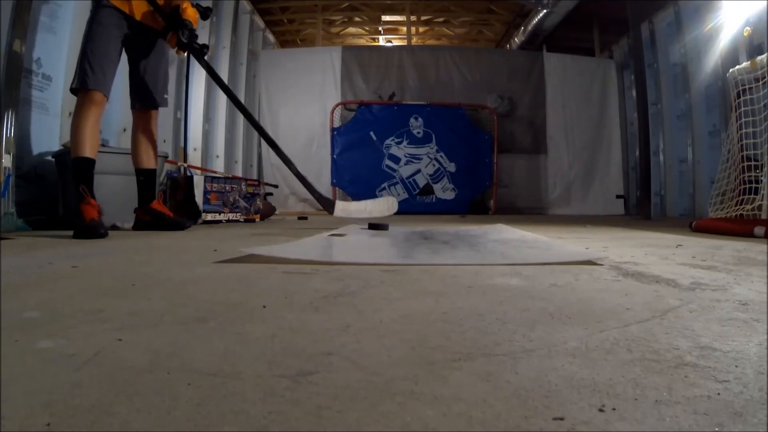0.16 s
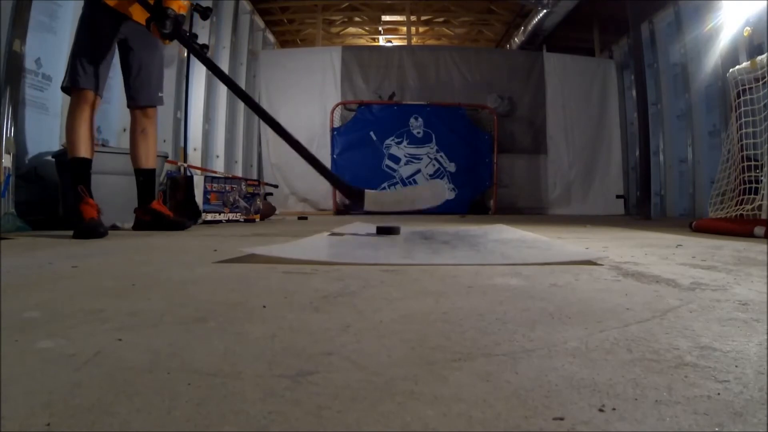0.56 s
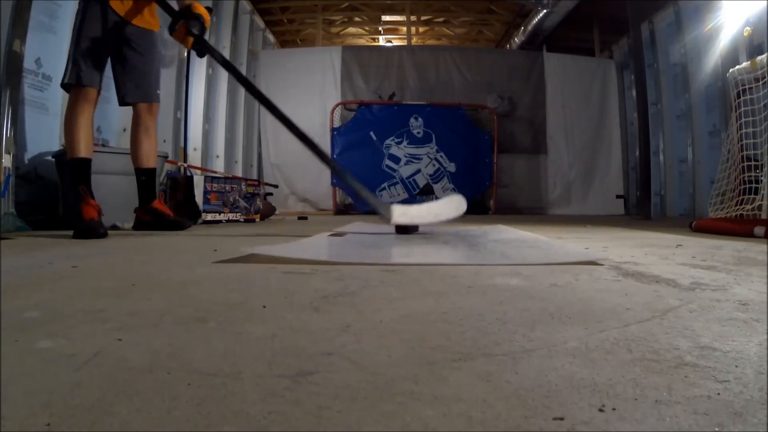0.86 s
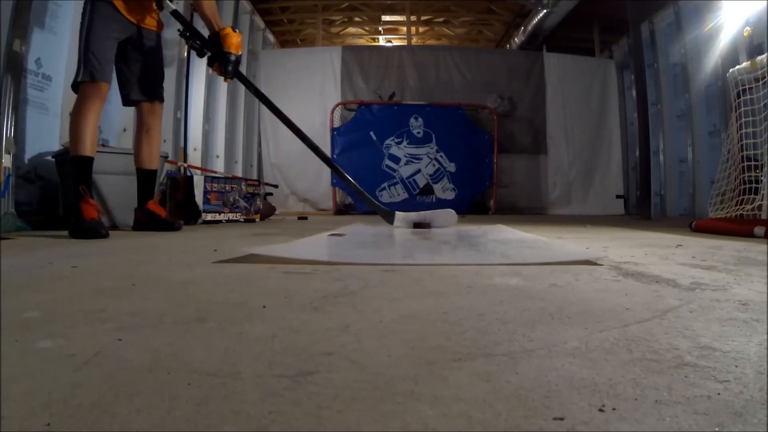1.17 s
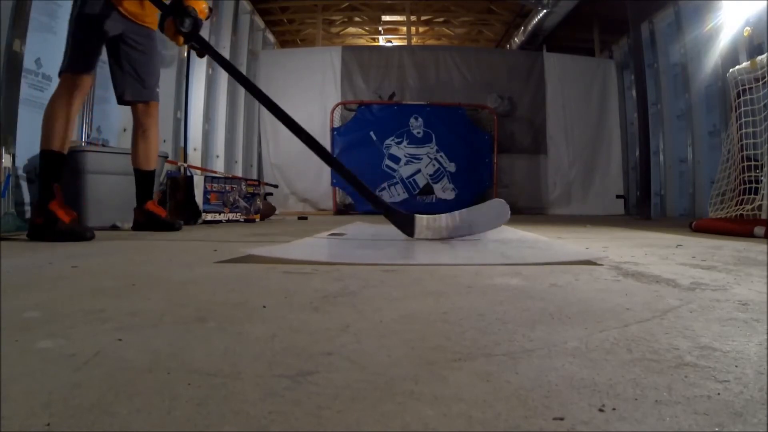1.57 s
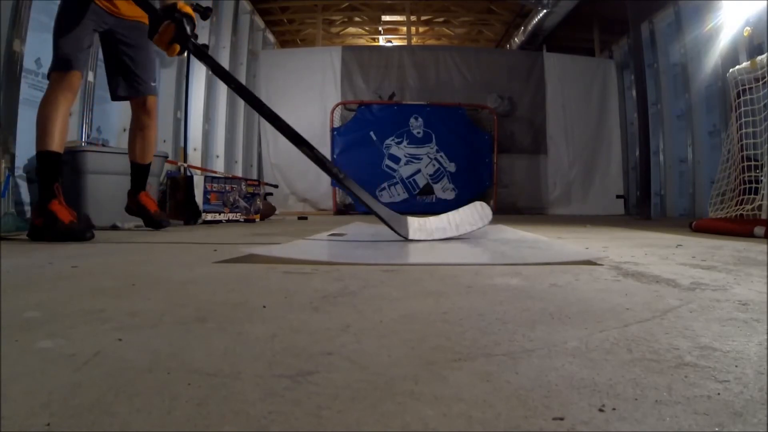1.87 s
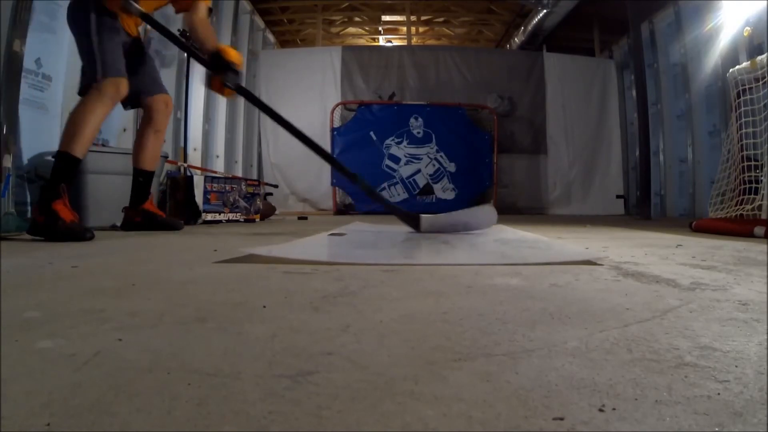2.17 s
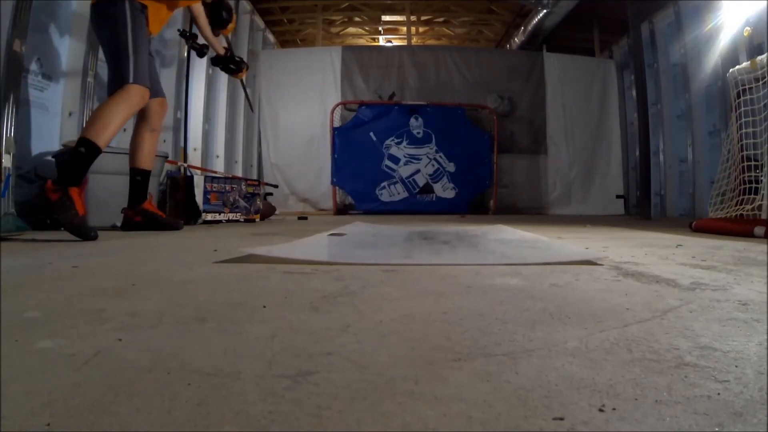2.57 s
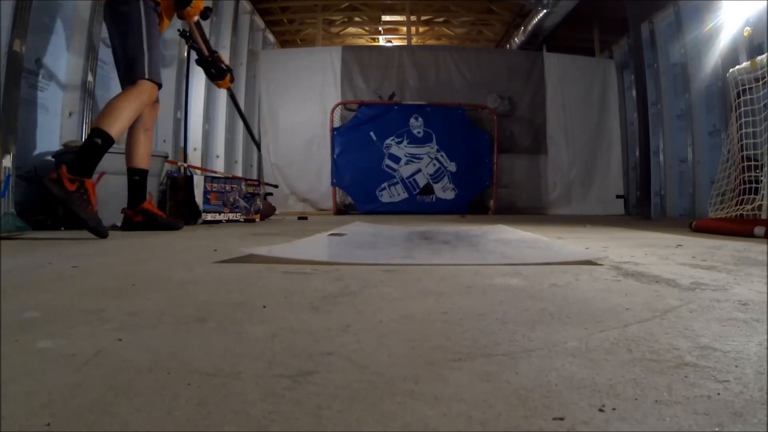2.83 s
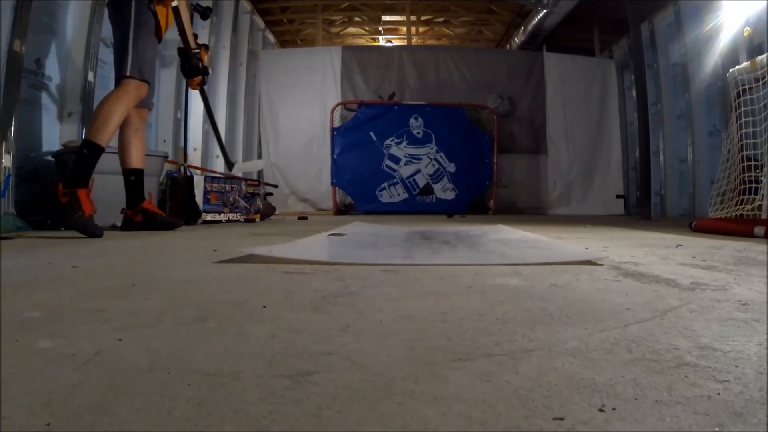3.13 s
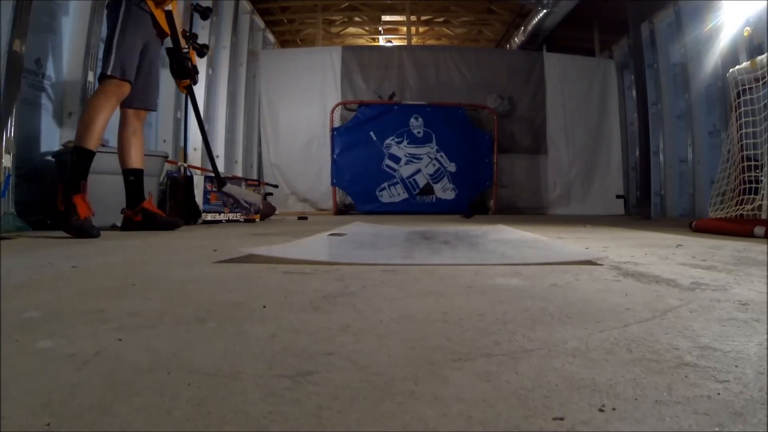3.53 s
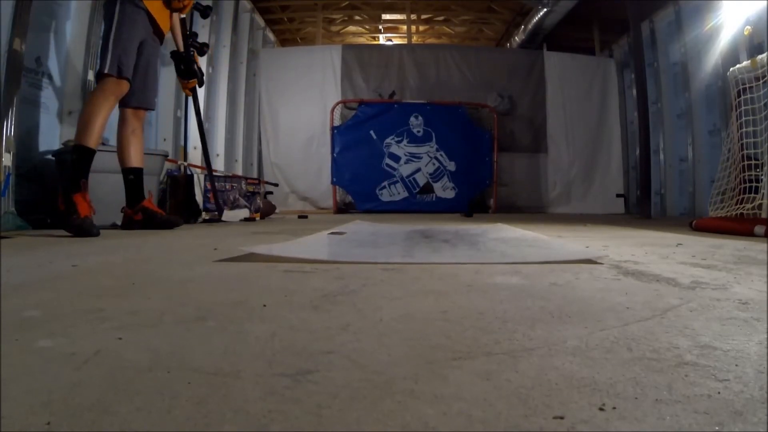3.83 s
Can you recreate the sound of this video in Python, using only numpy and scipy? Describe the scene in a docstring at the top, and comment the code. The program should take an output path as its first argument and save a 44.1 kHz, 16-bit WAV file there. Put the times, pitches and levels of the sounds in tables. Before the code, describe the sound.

A hockey stick knocks a puck back and forth on a plastic pad, with slaps and scrapes, then a sweeping shot booms into a tarp on a steel goal; echoing concrete garage, microphone close to the floor.

```python
"""Over faint mains hum in a bare concrete garage, a sliding sound fades and a hockey blade touches a plastic pad.
The blade taps a puck, slaps the pad and slides: struck modes, coloured bursts and friction noise.
A sweeping shot scrapes, then thuds into a tarp on a steel goal: gliding low modes, and a frame of paired partials.
A hard broad crack and soft bumps follow; a last woody knock is cut off by a brief silence.
Blows get synthetic room echoes; loud peaks clip and the top is cut."""
import sys
import numpy as np
from scipy import signal
from scipy.fft import rfft, irfft, next_fast_len
from scipy.io import wavfile

SR = 44100
rng = np.random.default_rng(int(sys.argv[2]) if len(sys.argv) > 2 else 0)


def output_pcm(signal):
    """Save a mono or channel-first signal as 16-bit PCM at the path in sys.argv[1].

    Samples are clipped to [-1, 1] before scaling.
    """
    pcm = np.clip(np.atleast_2d(signal).T, -1, 1) * 32767
    wavfile.write(sys.argv[1], SR, np.round(pcm).astype(np.int16))


N = 176400
T = np.arange(N) / SR  # s
AGE = T[:SR * 3 // 2]  # s since a blow
IMPULSE = 1. * (AGE == 0)

# still air spectrum: f/Hz, level/dB
AIR = [(18, -27), (35, 4), (55, -21.5), (80, -3.5), (125, 0), (180, -13.5), (400, -15), (830, -25.5),
       (2000, -30.5), (5000, -35.5), (13000, -45), (15500, -67)]
AIR_DB = -54.5
# mains hum: f/Hz, rms level/dB
HUM = [(59.2, -58), (119.3, -54)]

# garage decay: f/Hz, t60/s
ROOM_T60 = [(60, 0.5), (250, 0.58), (700, 0.4), (1500, 0.42), (3000, 0.37), (6000, 0.6), (13000, 0.23)]
EARLY_T60_S, EARLY_DB, FIRST_ECHO_S = 0.15, 3.5, 0.0021

# gear ticks: t/s, level/dB
TICKS = [(0.098, -54.5), (3.77, -50), (3.8075, -57), (3.8604, -49.5)]
# tick spectrum: f/Hz, level/dB
TICK_COLOUR = [(200, -12), (1500, 10), (2800, -0.5), (4600, 8), (8000, -6.5), (15000, -26)]
# soft settling bumps: t/s, level/dB
BUMPS = [(2.727, -33.5), (2.80, -37), (3.405, -41), (3.454, -44), (3.494, -52)]
# bump spectrum: f/Hz, level/dB
BUMP_COLOUR = [(80, -1.5), (300, 3), (600, 4.5), (1200, -0.5), (2800, -7), (6000, -32), (15000, -59)]

OPENING_DB = -55.5  # fading echo at the start
TOUCH_S, TOUCH_DB = .3438, -36.5

# puck and blade sliding on the pad: t/s, level/dB
SLIDE = [(.338, -86), (.35, -34.5), (.44, -41), (.62, -41.5), (.77, -44.5), (.9, -64), (1.0, -49),
         (1.04, -38.5), (1.15, -43.5), (1.28, -29.5), (1.39, -43), (1.512, -46), (1.524, -37.5),
         (1.565, -41.5), (1.6, -27.5), (1.63, -45.5), (1.82, -49), (2.06, -46), (2.12, -40.5), (2.3, -43),
         (2.38, -41), (2.55, -52.5)]
# slide spectrum: f/Hz, level/dB
SLIDE_COLOUR = [(80, -11), (300, -4), (550, 3), (900, 7.5), (1500, 4), (2500, -2.5), (5000, -17.5),
                (9000, -29.5), (15000, -35.5)]
# high hiss of the sliding: t/s, level/dB
HISS = [(.338, -97), (.348, -51), (.66, -48.5), (.77, -59.5), (1.0, -65), (1.04, -52.5), (1.3, -57),
        (1.39, -46.5), (1.48, -63), (1.52, -44.5), (1.62, -62), (1.83, -96), (1.9, -57.5), (2.07, -57.5),
        (2.1, -50), (2.2, -49.5), (2.3, -35), (2.37, -53), (2.55, -66)]
# hiss spectrum: f/Hz, level/dB
HISS_COLOUR = [(1000, -3), (4000, 5), (8000, -8), (12000, -5), (14000, -18), (16000, -23.5)]
SWEEP_S, SWEEP_DB, SWEEP_RISE_S, SWEEP_FALL_S = 2.287, -33.5, 0.04, 0.022  # peak; time constants
# shot scrape spectrum: f/Hz, level/dB
SWEEP_COLOUR = [(200, -1), (1000, -26), (2000, 4.5), (3600, -3), (6000, -19), (14000, -17)]

# tarp rustle: t/s, level/dB
RUSTLE = [(2.8, -50), (2.9, -46.5), (2.98, -50), (3.045, -46), (3.1, -55), (3.19, -53), (3.3, -66)]
# rustle spectrum: f/Hz, level/dB
RUSTLE_COLOUR = [(150, 2.5), (500, -2), (1300, 0), (2500, -9), (4500, -17), (8000, -28), (12500, -25.5),
                 (15500, -27)]

# low knocks under the shot: t/s, level/dB, f/Hz
LOW_KNOCKS = [(2.3935, -29, 208), (2.405, -30, 269), (2.42, -29.5, 352), (2.476, -35.5, 140)]
# low knock modes: ratio to f, level/dB, t60/s
LOW_KNOCK_MODES = [(1, -3, .07), (2.05, -6.5, .04)]

# stick clacks: t/s, level/dB
CLACKS = [(2.323, -36.5), (2.3695, -34.5), (2.3925, -23.5), (2.407, -34), (2.421, -37.5)]
# clack spectrum: f/Hz, level/dB
CLACK_COLOUR = [(60, -6.5), (150, 3), (300, 6.5), (500, 1), (900, 1), (2300, -1.5), (3500, -12),
                (6000, -23), (8800, -26.5), (11000, -50.5), (15000, -44)]

# heel and toe bounces on the pad: t/s, level/dB
BOUNCES = [(0.7983, -23), (0.8019, -21.5), (1.1738, -22.5), (1.1816, -24), (1.1844, -20.5), (1.1878, -22.5),
           (1.6358, -21)]
# bounce modes: f/Hz, level/dB, t60/s
BOUNCE_MODES = [(1015, 1.5, 0.0041), (1544, 3, 0.005), (2110, -4, .004)]
# bounce spectrum: f/Hz, level/dB
BOUNCE_COLOUR = [(60, -4.5), (500, 0), (1500, 0.5), (4000, 5), (14000, -12)]
BOUNCE_ROOM_DB = -3.5

# blade on pad: t/s, level/dB, click level/dB, chatter t60/s, tilt/(dB/octave)
SLAPS = [(0.7823, -16.5, 1, 0.12, -1.4), (1.1699, -17.5, -5, 0.19, -2), (1.5164, -34, -3.5, 0.14, -10.5),
         (1.629, -21, -1.5, 0.24, 0.5)]
# slap click spectrum: f/Hz, level/dB
SLAP_CLICK = [(25, -50), (100, -5), (400, -2), (1000, 12), (2500, -1.5), (3500, 1.5), (5000, -8),
              (9000, -18.5), (13000, -21.5), (16000, -45.5)]
# slap chatter spectrum: f/Hz, level/dB
SLAP_BODY = [(35, -25.5), (120, -20.5), (250, -10), (400, -7.5), (700, -0.5), (1050, 1), (1700, 0),
             (2700, -15), (3600, -14.5), (5000, -26.5), (9000, -36.5), (15000, -41)]
# edge buzz spectrum: f/Hz, level/dB
SPATTER_COLOUR = [(100, -8), (1200, 1.5), (2500, -3), (5000, -3.5), (9000, -11), (12500, -8), (16000, -38)]
SLAP_RISE_S, SLAP_ROOM_DB, CLICK_ROOM_DB = 0.009, 2, 1
CLICK_DB, SPATTER_DB, SPATTER_T60_S, SPATTER_LAG_S = -2.5, -7.5, 0.03, .003

# blade on puck: t/s, level/dB, f/Hz, room level/dB, tilt/(dB/octave)
TAPS = [(0.4493, -12.5, 886, -3, 1.5), (0.853, -13, 730, -6, 1), (1.27, -16, 775, -2, 3.5),
        (1.6297, -14.5, 1050, -3, -1.5), (1.7038, -17.5, 666, -5, -0.5)]
# blade and puck modes: ratio to f, level/dB, t60/s
TAP_MODES = [(.9, -4.5, 0.0091), (1.03, -1, 0.01), (.52, -17, 0.0196)]
# tap spectrum: f/Hz, level/dB
TAP_COLOUR = [(15, -26.5), (40, -19), (90, -3), (300, 9.5), (1000, 11), (1600, 16.5), (2400, 18.5),
              (3400, 9), (5000, 4), (7500, -13), (15000, -21.5)]

# wooden knock and rebounds: t/s, level/dB
KNOCKS = [(3.919, -20.5), (3.9218, -21.5), (3.926, -23.5)]
# wooden modes: f/Hz, level/dB, t60/s
KNOCK_MODES = [(1198, 7, 0.064), (1860, -18, .02), (2070, -8, 0.036), (2840, -14, .03), (4460, -21, .04)]
# knock contact spectrum: f/Hz, level/dB
KNOCK_COLOUR = [(100, -14), (330, -4), (600, -8.5), (1100, 12.5), (1600, 5), (2500, 1), (3600, -25.5),
                (5000, -25.5), (7000, -34), (14000, -58)]

# hard contacts after the shot: t/s, level/dB
CRACKS = [(3.198, -28.5), (3.201, -24.5), (3.2093, -18)]
# crack spectrum: f/Hz, level/dB
CRACK_COLOUR = [(80, -14.5), (180, -25.5), (280, -5), (400, -14.5), (800, -9), (1250, -7), (2000, -0.5),
                (2800, -0.5), (3600, -8), (4800, -12.5), (8000, -22), (12500, -28.5), (15500, -43)]
# crack ring modes: f/Hz, level/dB, t60/s
CRACK_MODES = [(557, -2.5, 0.12), (1216, -1.5, 0.1), (1790, 0, 0.1), (2100, -1.5, .08), (2580, 0, .06),
               (2900, -2, .06)]
CRACK_RING_DB, CRACK_CHATTER_DB, CRACK_ROOM_DB = -17, -7, 5.5

# steel tube modes: f/Hz, level/dB, t60/s
FRAME_MODES = [(2340, 5.5, .5), (2643, 0.5, 0.76), (3030, 1.5, 0.68), (3080, 7.5, .35), (3395, -3, 0.51),
               (3698, 0, 0.61), (3800, 0.5, 0.56), (4208, -10, .55), (4646, -3.5, 0.69), (5570, -13, .55),
               (6471, -17, 0.32)]
# loose fittings spectrum: f/Hz, level/dB
FRAME_RATTLE = [(300, -17), (1500, 1), (3000, 6), (5500, -6.5), (8000, -21), (14000, -35)]
FRAME_S, FRAME_DB, FRAME_RATTLE_T60_S = 2.7297, -32, 0.57
FRAME_SPLIT, FRAME_TWIN_DB, FRAME_ROOM_DB = 0.012, -2, -3  # split: share of f

# tarp and room modes: slack f/Hz, level/dB, t60/s
BOOM_MODES = [(53.6, -0.5, 2.2), (45.1, -6, .9), (83, 5.5, 0.94), (114.6, -8.5, 0.6), (150.7, -7, 0.35),
              (181, -8, 0.55)]
BOOM_S, BOOM_DB = 2.612, -11
BOOM_SAG, BOOM_SAG_S = 0.13, 0.11  # initial sharpness as a share of f; time constant
BOOM_WAVER, BOOM_LUMPS_DB = .06, 3  # share of f and level, per unit of random wander
# tarp rumble spectrum: f/Hz, level/dB
RUMBLE_COLOUR = [(18, -27), (35, -16.5), (55, 1.5), (72, -2), (110, 0.5), (190, -13.5), (300, -27),
                 (1000, -63.5)]
RUMBLE_DB, RUMBLE_T60_S = -14.5, 0.96

# puck into tarp, then flaps: t/s, level/dB, f/Hz, smack level/dB
THUDS = [(2.5918, -7, 171, -4.5), (2.6237, -8.5, 61.2, -8.5), (2.649, -14.5, 91, -10.5),
         (2.664, -11, 132, -16), (2.685, -18, 85, -13), (2.722, -24, 105, -14.5), (2.83, -28.5, 80, -21)]
# cloth smack spectrum: f/Hz, level/dB
CLOTH = [(60, -10.5), (200, -10), (330, -4), (450, 0), (615, 4.5), (800, -6.5), (1400, -9.5), (2000, -14),
         (2800, -21), (5000, -30), (9000, -34.5), (13000, -41), (16000, -51)]
THUD_T60_S, THUD_ROOM_DB = 0.04, -13

SILENCE_START_S, SILENCE_END_S = 3.9565, 3.989
TOP_HZ = 15400


def amp(db):
    """Decibels to gain."""
    return 10 ** (np.asarray(db) / 20)


def decay(t60_s):
    """Exponential decay, 60 dB in t60."""
    return amp(-60 * AGE / t60_s)


def unit(x):
    """Scale a blow to the energy of 10 ms at rms 1."""
    return x * np.sqrt(.01 * SR / np.sum(x ** 2))


def along(hz, points):
    """Interpolate (Hz, value) points on a log-frequency axis."""
    point_hz, value = np.array(points, float).T
    return np.interp(np.log(hz + 1), np.log(point_hz), value)


def colour(x, points, tilt_db=0):
    """Minimum-phase filter through (Hz, dB) points, tilted by about tilt_db per octave above 1 kHz and flat
    toward 0 Hz."""
    n = next_fast_len(len(x) // 2 + 2048) * 2
    hz = np.arange(n // 2 + 1) * SR / n
    gain_db = along(hz, points) + tilt_db * np.log2(1 + hz / 1000)
    cepstrum = irfft(np.log(amp(gain_db)))
    # fold to the causal side
    cepstrum[1:n // 2] *= 2
    cepstrum[n // 2 + 1:] = 0
    return irfft(rfft(x, n) * np.exp(rfft(cepstrum)))[:len(x)]


def grains(size, spread_db):
    """Dense tiny clicks of uneven strength, rms 1."""
    strength_db = spread_db * np.minimum(rng.exponential(size=size), 6)
    x = rng.standard_normal(size) * amp(strength_db)
    return x / x.std()


def ring(modes, hz=1):
    """Struck modes: decaying sines, frequencies scaled by hz."""
    return unit(sum(amp(db) * np.sin(2 * np.pi * f * hz * AGE) * decay(t60) for f, db, t60 in modes))


def burst(t60_s):
    """Chatter of small contacts dying away."""
    return unit(grains(len(AGE), 2) * decay(t60_s))


def contact(points, t60_s, chatter_db, tilt_db=0):
    """One sharp push plus chatter, coloured by the struck thing."""
    push = unit(IMPULSE)
    return unit(colour(push + amp(chatter_db) * burst(t60_s), points, tilt_db))


def garage(x, wet_db):
    """Direct sound, scattered early echoes and a diffuse tail; fresh echoes each call."""
    spectrum = rfft(rng.standard_normal(len(AGE)))
    hz = np.arange(len(AGE) // 2 + 1) * SR / len(AGE)
    centres_hz = 60 * 2. ** np.arange(9)
    tail = 0
    for centre_hz in centres_hz:
        band = along(hz, list(zip(centres_hz, centres_hz == centre_hz)))
        tail = tail + irfft(spectrum * band) * decay(along(centre_hz, ROOM_T60))
    early = grains(len(AGE), 5) * decay(EARLY_T60_S)
    onset = np.clip(AGE / FIRST_ECHO_S - 1, 0, 1)
    echoes = (tail + amp(EARLY_DB) * early) * onset
    wet = signal.fftconvolve(x, echoes / np.linalg.norm(echoes))
    return np.pad(x, (0, len(AGE) - 1)) + amp(wet_db) * wet


def at(s, db, x):
    """Place a sound in time at a level."""
    return amp(db) * np.pad(x, (max(int(s * SR), 0), N))[:N]


def rub(points, grit_db):
    """Steady noise of fine grains through a spectrum, rms 1."""
    x = colour(grains(N, grit_db), points)
    return x / x.std()


def curve(points):
    """Gain from (s, dB) points, -120 dB outside."""
    return amp(np.interp(T, *np.array(points).T, left=-120, right=-120))


def wander(t, step_s, end_s):
    """Random values of unit deviation every step, joined by lines."""
    knots_s = np.arange(0, end_s, step_s)
    return np.interp(t, knots_s, rng.standard_normal(len(knots_s)))


def until(s):
    """Gain closing over 1.5 ms about a given time."""
    return np.clip((s - T) / .0015 + .5, 0, 1)


def room_tone():
    """Still air as coloured noise; mains hum as sines."""
    hum = sum(amp(db) * np.sqrt(2) * np.sin(2 * np.pi * (hz * T + rng.random())) for hz, db in HUM)
    return amp(AIR_DB) * rub(AIR, grit_db=-1.5) + hum


def gear_ticks():
    """Light contacts of the gear, with bright chatter."""
    return sum(at(s, db, garage(contact(TICK_COLOUR, t60_s=0.099, chatter_db=4.5), wet_db=-4.5))
               for s, db in TICKS)


def soft_bumps():
    """Dull contacts as things settle, with long chatter."""
    return sum(at(s, db, garage(contact(BUMP_COLOUR, t60_s=0.28, chatter_db=-1.5), wet_db=6.0))
               for s, db in BUMPS)


def first_touch():
    """Echo of an earlier stroke as fading friction noise, then a light contact as the blade starts to slide."""
    fading = amp(OPENING_DB - 60 * T / along(1000, ROOM_T60)) * rub(SLIDE_COLOUR, grit_db=7.0)
    tick = contact(SLIDE_COLOUR, t60_s=0.063, chatter_db=12, tilt_db=3.5)
    return fading + at(TOUCH_S, TOUCH_DB, garage(tick, wet_db=-11.5))


def sliding():
    """Uneven friction on the pad, swelling into the scrape of the shot."""
    uneven = amp(1.1 * wander(T, step_s=.012, end_s=4.1))
    slide = curve(SLIDE) * rub(SLIDE_COLOUR, grit_db=2)
    hiss = curve(HISS) * rub(HISS_COLOUR, grit_db=2.5)
    swell = np.exp(np.minimum((T - SWEEP_S) / SWEEP_RISE_S, (SWEEP_S - T) / SWEEP_FALL_S))
    sweep = amp(SWEEP_DB) * swell * rub(SWEEP_COLOUR, grit_db=4.5)
    return uneven * (slide + hiss + sweep)


def rustle():
    """Cloth friction as the hanging tarp swings back."""
    return curve(RUSTLE) * rub(RUSTLE_COLOUR, grit_db=2.5)


def low_knocks():
    """Dull two-mode knocks, probably shoes and flexing shaft, as the weight shifts."""
    return sum(at(s, db, garage(ring(LOW_KNOCK_MODES, hz), wet_db=-9)) for s, db, hz in LOW_KNOCKS)


def stick_clacks():
    """The stick rattles around the shot in short coloured contacts."""
    return sum(at(s, db, garage(contact(CLACK_COLOUR, t60_s=0.093, chatter_db=-3.5), wet_db=-3.0))
               for s, db in CLACKS)


def blade_bounces():
    """Heel and toe land in separate clacks of short modes."""
    return sum(at(s, db, garage(unit(colour(ring(BOUNCE_MODES), BOUNCE_COLOUR)), BOUNCE_ROOM_DB))
               for s, db in BOUNCES)


def blade_slaps():
    """The blade's edge clicks and buzzes on the pad, then both chatter together."""
    out = 0
    for s, db, click_db, t60_s, tilt_db in SLAPS:
        click = unit(colour(IMPULSE, SLAP_CLICK, tilt_db))
        buzz = unit(colour(burst(SPATTER_T60_S), SPATTER_COLOUR, tilt_db))
        rise = 1 - np.exp(-AGE / SLAP_RISE_S)
        body = unit(colour(burst(t60_s) * rise, SLAP_BODY, tilt_db))
        out = out + at(s, db + click_db + CLICK_DB, garage(click, CLICK_ROOM_DB))
        out = out + at(s + SPATTER_LAG_S, db + click_db + SPATTER_DB, garage(buzz, wet_db=-6.5))
        out = out + at(s, db, garage(body, SLAP_ROOM_DB))
    return out


def puck_taps():
    """The blade stops the rubber puck: a hollow knock of fast-decaying modes."""
    out = 0
    for s, db, hz, wet_db, tilt_db in TAPS:
        tap = unit(colour(ring(TAP_MODES, hz), TAP_COLOUR, tilt_db))
        out = out + at(s, db, garage(tap, wet_db))
    return out


def last_knock():
    """Wooden modes plus contact noise, with two quick rebounds."""
    out = 0
    for s, db in KNOCKS:
        blow = ring(KNOCK_MODES) + amp(3) * contact(KNOCK_COLOUR, t60_s=0.047, chatter_db=2)
        out = out + at(s, db, garage(unit(blow), wet_db=-3.5))
    return out


def crack():
    """Something hard, probably the stick, strikes near the wall: broad contacts with a trace of ring."""
    out = 0
    for s, db in CRACKS:
        hit = contact(CRACK_COLOUR, t60_s=0.026, chatter_db=CRACK_CHATTER_DB)
        blow = hit + amp(CRACK_RING_DB) * ring(CRACK_MODES)
        out = out + at(s, db, garage(unit(blow), CRACK_ROOM_DB))
    return out


def goal_frame():
    """The puck drops on the steel frame: paired close partials ring, loose fittings rattle."""
    split = 1 + FRAME_SPLIT * rng.uniform(-1.1, 1, len(FRAME_MODES))
    twins = [(hz * k, db + FRAME_TWIN_DB, t60) for (hz, db, t60), k in zip(FRAME_MODES, split)]
    tubes = garage(ring(FRAME_MODES + twins), FRAME_ROOM_DB)
    rattle = unit(colour(burst(FRAME_RATTLE_T60_S), FRAME_RATTLE))
    return at(FRAME_S, FRAME_DB, tubes) + at(FRAME_S, FRAME_DB, rattle)


def tarp_boom():
    """Low modes sink as the tarp slackens, their pitch and level wandering; noise rumbles below."""
    tension = 1 + BOOM_SAG * np.exp(-AGE / BOOM_SAG_S)
    boom = 0
    for hz, db, t60_s in BOOM_MODES:
        waver = 1 + BOOM_WAVER * wander(AGE, step_s=1 / 25, end_s=1.6)
        phase = 2 * np.pi * np.cumsum(hz * tension * waver) / SR
        level_db = db + BOOM_LUMPS_DB * wander(AGE, step_s=1 / 25, end_s=1.6)
        boom = boom + amp(level_db) * np.sin(phase) * decay(t60_s)
    rumble = unit(colour(burst(RUMBLE_T60_S), RUMBLE_COLOUR))
    return at(BOOM_S, BOOM_DB, unit(boom)) + at(BOOM_S, RUMBLE_DB, rumble)


def tarp_thuds():
    """The puck hits the tarp, which flaps back: short low modes with echoing cloth smacks."""
    out = 0
    for s, db, hz, smack_db in THUDS:
        thud = colour(ring([(hz, 0, THUD_T60_S)]), [(15, -28), (32, -9), (50, 1.0)])  # Hz, dB
        smack = garage(unit(IMPULSE), wet_db=12)[:len(AGE)] + amp(6.5) * burst(t60_s=0.08)
        out = out + at(s, db, garage(thud, THUD_ROOM_DB))
        out = out + at(s, db + smack_db, unit(colour(smack, CLOTH)))
    return out


def scene():
    """Sum of all sources; the play ends abruptly, the room tone goes on."""
    handling = first_touch() + sliding() + blade_bounces() + blade_slaps() + puck_taps()
    shot = rustle() + low_knocks() + stick_clacks() + goal_frame() + tarp_boom() + tarp_thuds()
    rest = gear_ticks() + soft_bumps() + last_knock() + crack()
    return (room_tone() + (handling + shot + rest) * until(SILENCE_START_S))[None]


def record(dry):
    """Brief silence near the end, clipped peaks, steep low-pass."""
    live = until(SILENCE_START_S) + 1 - until(SILENCE_END_S)
    clipped = np.clip(dry * live, -.98, .98)
    low_pass = signal.ellip(10, .2, 90, TOP_HZ, fs=SR, output="sos")
    return signal.sosfilt(low_pass, clipped)


dry = scene()
out = record(dry)
output_pcm(out)
```